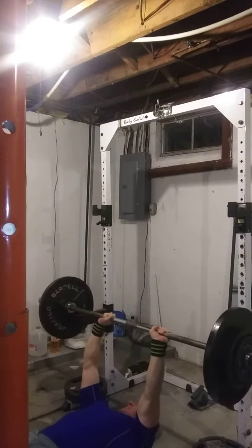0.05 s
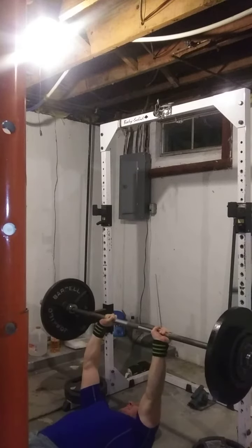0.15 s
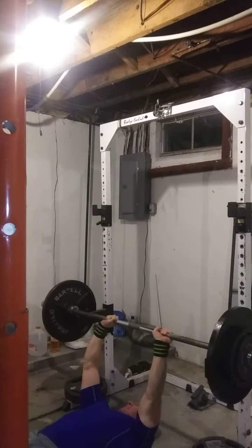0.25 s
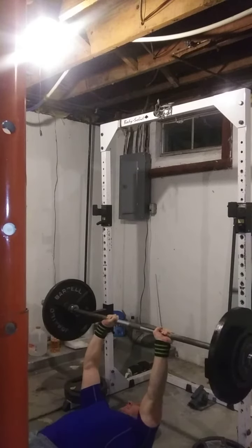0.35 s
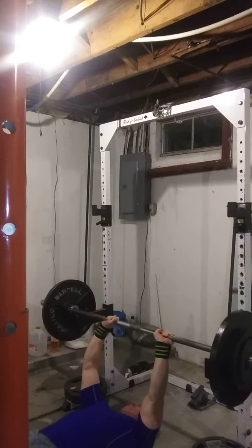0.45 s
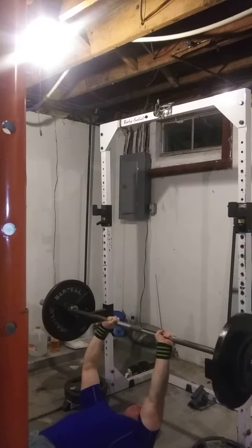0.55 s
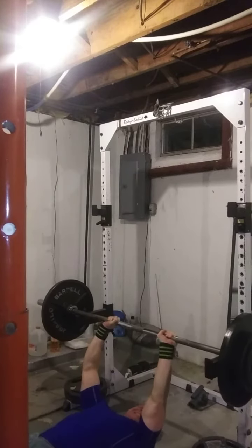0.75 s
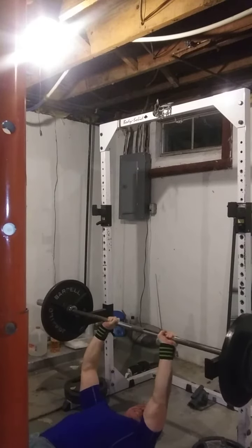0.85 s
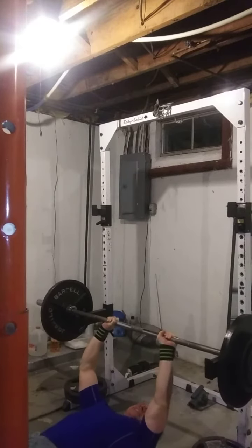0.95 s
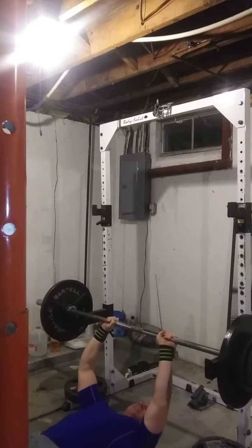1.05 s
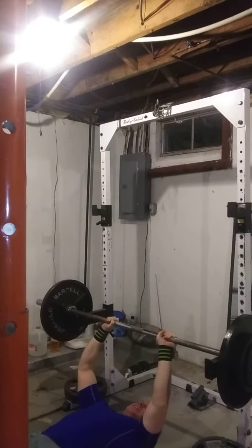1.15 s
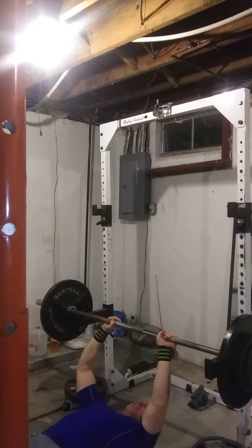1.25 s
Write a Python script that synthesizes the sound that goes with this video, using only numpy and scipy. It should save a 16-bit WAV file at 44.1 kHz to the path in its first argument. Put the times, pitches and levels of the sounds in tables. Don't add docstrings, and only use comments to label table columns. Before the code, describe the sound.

After a quiet moment, a heavy barbell clatters into a metal rack, hard clanks repeating quickly as iron plates and bar end rattle, then weaken and ring away in a hard concrete room, caught by a nearby phone microphone.

```python
import sys
import numpy as np
from scipy import signal
from scipy.fft import rfft, irfft, next_fast_len
from scipy.io import wavfile
from scipy.ndimage import uniform_filter1d

SR = 44100
rng = np.random.default_rng(int(sys.argv[2]) if len(sys.argv) > 2 else 0)


def generate_wav(sig):
    pcm = np.round(np.clip(np.atleast_2d(sig).T, -1, 1) * 32767).astype(np.int16)
    wavfile.write(sys.argv[1], SR, pcm)


def undo_db(level):
    steps = np.asarray(level, float) / 20
    return 10 ** steps


N = 57330


def unit(x):
    return x / np.sqrt(np.mean(x ** 2) + 1e-20)


def energy_one(x):
    return x / np.linalg.norm(x)


def along(points, hz):
    f, value = np.transpose(points)
    return np.interp(np.log(hz + 1), np.log(f + 1), value)


def coloured(x, gain_db):
    size = 4096
    gain = undo_db(gain_db(np.fft.rfftfreq(size, 1 / SR)))
    cepstrum = irfft(np.log(gain + 1e-6), size)
    cepstrum[1:size // 2] *= 2
    cepstrum[size // 2 + 1:] = 0
    impulse = irfft(np.exp(rfft(cepstrum)), size)
    return signal.fftconvolve(x, impulse)[:len(x)]


def dying(t60s, count, rows):
    hz, t, z = signal.stft(rng.standard_normal((rows, count)), SR, nperseg=256)
    decay = undo_db(-60 * t / along(t60s, hz)[:, None])
    return signal.istft(z * decay, SR, nperseg=256)[1][:, :count]


# frequency in Hz, level in dB per Hz.
AIR = [(59, -86), (100, -18), (322, -27), (676, -13), (854, -8), (3250, -22.5), (15000, -36), (16000, -31)]


def air_noise():
    return coloured(rng.standard_normal(N), lambda hz: along(AIR, hz))


def air():
    return undo_db(-60) * unit(air_noise())


# frequency in Hz, level in dB rms.
EARLIER = [(333.8, -74), (839.8, -68), (877.5, -66), (1093, -70.5), (1497, -75), (1674, -98), (1900, -84)]


def earlier_knock():
    t60_s, tones_db, tail_db, waver_rad = 0.67, 14, -64, 0.63
    t = np.arange(N) / SR
    hz, db = np.transpose(EARLIER)[..., None]
    drift = unit(uniform_filter1d(rng.standard_normal((len(EARLIER), N)), 900, axis=1))
    start = rng.random(hz.shape) * 2 * np.pi
    tones = undo_db(db + tones_db) * np.sin(2 * np.pi * hz * t + start + waver_rad * drift)
    return undo_db(-60 * t / t60_s) * (tones.sum(0) + undo_db(tail_db) * unit(air_noise()))


def crowded(depth_db):
    peaks = unit(uniform_filter1d(rng.standard_normal(2049), 5))
    grid_hz = np.linspace(0, SR / 2, len(peaks))
    return lambda hz: depth_db * np.interp(hz, grid_hz, peaks) * np.clip(hz / 3000, .3, 1)


def ring(modes, t):
    spread_db, detune, longest_s = 2, 0.00793, 0.32
    hz, db, t60 = np.repeat(np.transpose(modes), 3, axis=1)[..., None]
    chance = rng.standard_normal((len(hz), 3))
    level = undo_db(db + spread_db * chance[:, :1] - 60 * t / np.clip(t60, .02, longest_s))
    phase = 2 * np.pi * (hz * (1 + detune * chance[:, 1:2]) * t + chance[:, 2:])
    return (level * np.sin(phase)).sum(0)


# frequency in Hz, level in dB, t60 in seconds.
RACK = [(690, -18, 0.17), (1200.6, 0.5, 0.27), (1239, -2, 0.065), (1570, -28, 0.091), (1560, 8, 0.05),
        (1762, -11.5, 0.34), (2295, -1.5, 0.27), (2463, 0, 0.052), (2880, -4, 0.099), (3444, -15.5, 0.25),
        (3920, -6, 0.12), (5120, -32, 0.082), (6230, -11.5, 0.08), (6347, -26, 0.31)]
PLATES = [(642, -21, 0.13), (1080, -4, 0.13), (1218, 3, 0.076), (1284, -1, 0.1), (1427, 2.5, 0.16),
          (1474, -8, 0.13), (1728, -13, 0.35), (1730, 0, 0.31), (2209, -3, 0.33), (2850, -9.5, 0.35),
          (3040, -8.5, 0.26), (4340, -38, 0.12), (5200, -20, 0.14), (5930, -11, 0.11)]
SLEEVE = [(730.5, -11.5, 0.14), (1120, -4, 0.18), (1241.4, 4.5, 0.17), (1402, -11, .2), (1724, -1, 0.11),
          (2190, -7, 0.33), (2920, 4, 0.064), (3280, -0.5, 0.061), (4330, -10, 0.18), (5168, -11, 0.17),
          (5350, -15, 0.099), (6500, -17, 0.15), (7989, -42, 0.12), (10500, -23, 0.057)]


def steel_rings(part, t):
    rack, plates, sleeve = np.clip(1 - np.abs(np.clip(part, 0, 2) - np.arange(3)), 0, 1)
    return rack * ring(RACK, t) + plates * ring(PLATES, t) + sleeve * ring(SLEEVE, t)


# frequency in Hz, t60 in seconds.
CLANK_T60 = [(200, 0.42), (1500, 0.21), (5000, 0.2), (14000, 0.027)]


def chatter(chatter_s, shape):
    scatter_db, fade_db = 7, 8
    taps = dying(CLANK_T60, count=len(shape), rows=5) * shape
    draw = rng.random((len(taps), 2))
    when = (np.arange(len(taps)) + draw[:, 0] - draw[0, 0]) / len(taps)
    sizes = undo_db(scatter_db * (2 * draw[:, 1] - 1) - fade_db * when)
    clank = np.zeros(SR)
    for tap, size, s in zip(taps, sizes, when * np.clip(chatter_s, .002, .1)):
        clank[int(s * SR):][:len(shape)] += size * tap
    return clank


# frequency in Hz, t60 in seconds.
ROOM = [(300, 1), (1300, 0.69), (2550, 0.82), (3400, 0.49), (4050, 0.72), (6500, 0.46), (10000, 0.4),
        (14000, 0.38)]


def room_tails(chatter_s):
    delay_s = 0.0056
    t = np.arange(SR) / SR
    return dying(ROOM, count=SR, rows=2) * (1 - np.exp(-t / (delay_s + chatter_s)))


# frequency in Hz, level in dB per Hz.
CLANK = [(150, -46), (300, -23.5), (650, -7.5), (1250, -1), (2300, -8.5), (5800, -19), (7500, -26.5),
         (16000, -41)]


def contact(db, tilt_db, part, chatter_s, steel):
    ring_db, room_db, ring_room_db, blow_db, rise_s = -4, -1.5, -3, 19.5, 0.0019
    t = np.arange(SR // 4) / SR
    shape = (1 - np.exp(-t / rise_s)) * np.cos(2 * np.pi * t)
    slope = lambda hz: tilt_db * np.log2((hz + 200) / 1500)
    rings = undo_db(ring_db) * energy_one(coloured(steel_rings(part, t) * shape, slope))
    taps = chatter(chatter_s, shape)
    clank_tail, ring_tail = room_tails(chatter_s)
    own = crowded(4)
    clank = energy_one(taps) + undo_db(room_db) * energy_one(clank_tail)
    clank = coloured(clank, lambda hz: along(CLANK, hz) + slope(hz) + own(hz) + steel(hz))
    echo = undo_db(ring_db + ring_room_db) * energy_one(signal.fftconvolve(rings, ring_tail)[:SR])
    return undo_db(db + blow_db) * (energy_one(clank) + echo + np.pad(rings, (0, SR - len(t))))


# start in seconds, peak level in dB, brightness in dB per octave,
# struck part (0 rack, 1 plates, 2 sleeve), chatter in seconds.
CONTACTS = [(0.1989, -4.5, 0.5, 0.27, 0.028), (.2946, -15.5, -1, 0.8, 0.028), (.379, -6, 0, 0.49, 0.032),
            (0.446, -12, -2, 0.83, .03), (.509, -11.5, -3.5, 1.47, 0.023), (.591, -12, 7, 0.69, .008),
            (.598, -2, -0.5, 0.96, .04), (.6584, -9.5, 3, 1.94, .01), (0.688, -23.5, -8.5, 1.4, .02),
            (.748, -41, 27, 0.99, .01), (.756, -3.5, -1, 1.8, .02), (.810, -8, 3, 2.3, .03),
            (.84, -8.5, 0, 1.67, .02), (.869, -24, 0, 2.4, .02), (.919, -17.5, -10.5, 1.14, .02),
            (0.981, -21.5, -6.5, 0.77, .02), (1.02, -32, 11, 0.44, 0.13)]


def barbell():
    out = np.zeros(N + 2 * SR)
    steel = crowded(1.5)
    for s, *blow in CONTACTS:
        out[round(s * SR):][:SR] += contact(*blow, steel)
    return out[:N]


# level in dB, frequency in Hz, rise in seconds, t60 in seconds.
FRAME = (-40.5, 182.5, -0.1, 0.17)


def frame():
    start_s, waver_db, waver_rad = .91, 5.4, 0.99
    db, hz, rise_s, t60 = FRAME
    t = np.clip(np.arange(N) / SR - start_s, 0, None)
    drift = unit(uniform_filter1d(rng.standard_normal(N), 1500))
    level = undo_db(db - 60 * t / t60 + waver_db * drift) * (1 - np.exp(-t / rise_s))
    return level * np.sin(2 * np.pi * hz * t + waver_rad * drift)


def scene():
    return (air() + earlier_knock() + barbell() + frame())[None]


def roll_off(x):
    return signal.sosfilt(signal.butter(12, 16360, fs=SR, output="sos"), x)


def record(dry):
    low_hz, dull_hz, dull_db, ceiling, top_hz = 199, 12500, -6, .75, 16180
    rumble_db, shake_db = -101, -64
    cut = signal.sosfilt(signal.butter(5, low_hz, "high", fs=SR, output="sos"), dry)[0]
    cut = coloured(cut, lambda hz: dull_db * np.log2(np.maximum(hz / dull_hz, 1)))
    cut = cut / (1 + np.abs(cut / ceiling) ** 4) ** .25
    rumble_colour = lambda hz: -3 * np.log2(hz + 20) - 24 * np.log2(1 + hz / 250)
    rumble = unit(coloured(rng.standard_normal(N), rumble_colour))
    shaken = undo_db(rumble_db) + undo_db(shake_db) * uniform_filter1d(np.abs(cut), 800)
    size = next_fast_len(N + 8192)
    in_band = np.fft.rfftfreq(size, 1 / SR) < top_hz
    heard = irfft(rfft(cut + shaken * rumble, size) * in_band, size)[None, :N]
    return roll_off(heard)


dry = scene()
out = record(dry)
generate_wav(out)
```